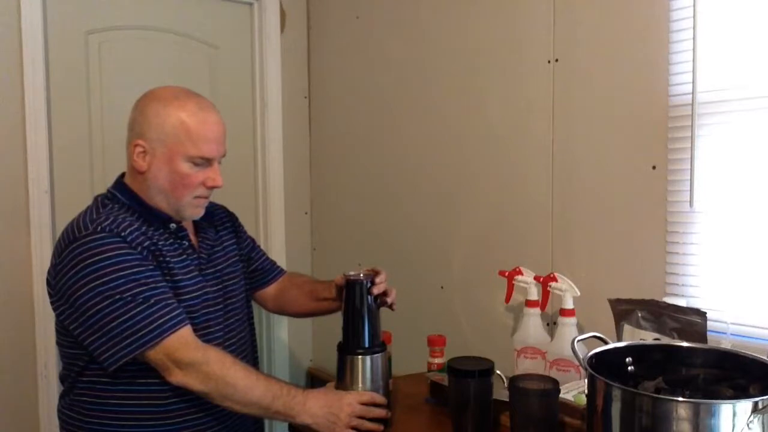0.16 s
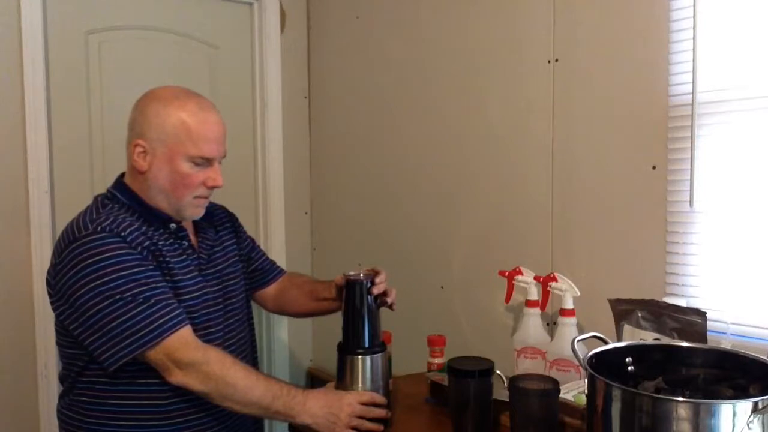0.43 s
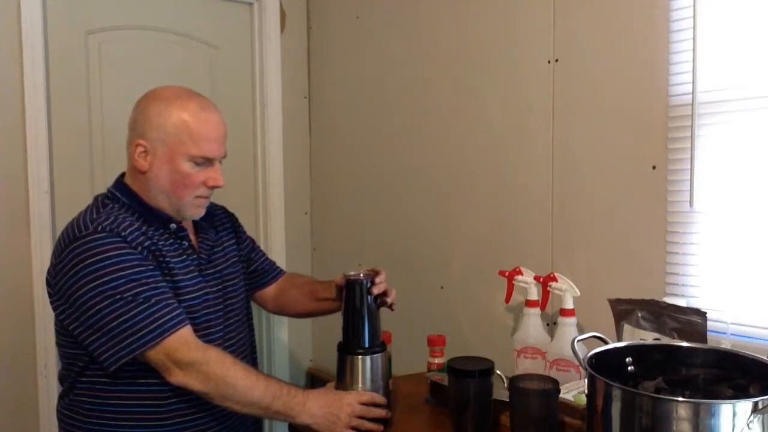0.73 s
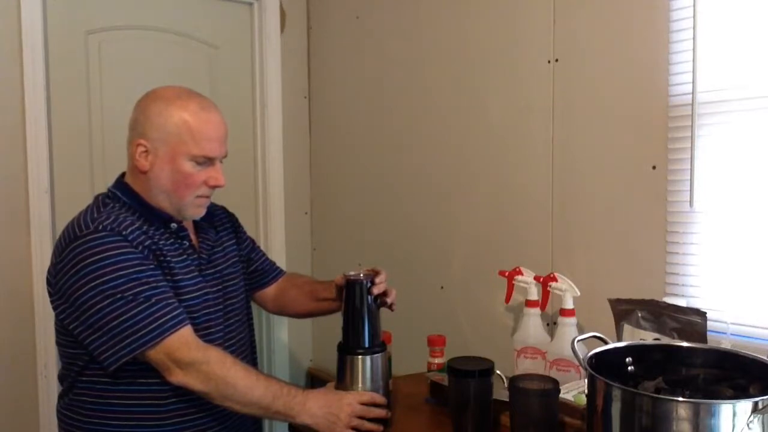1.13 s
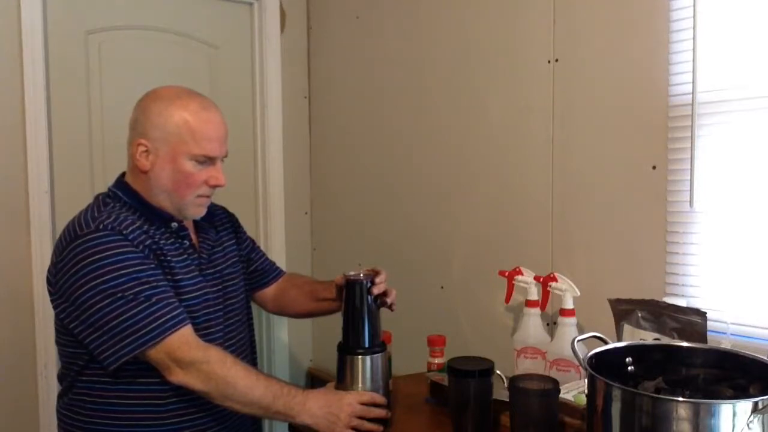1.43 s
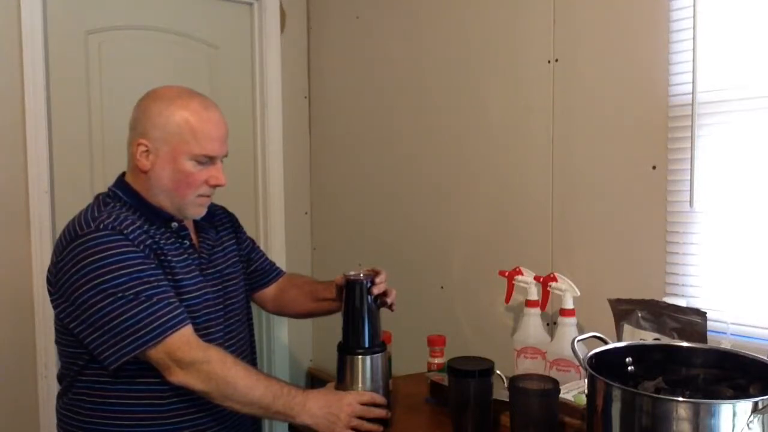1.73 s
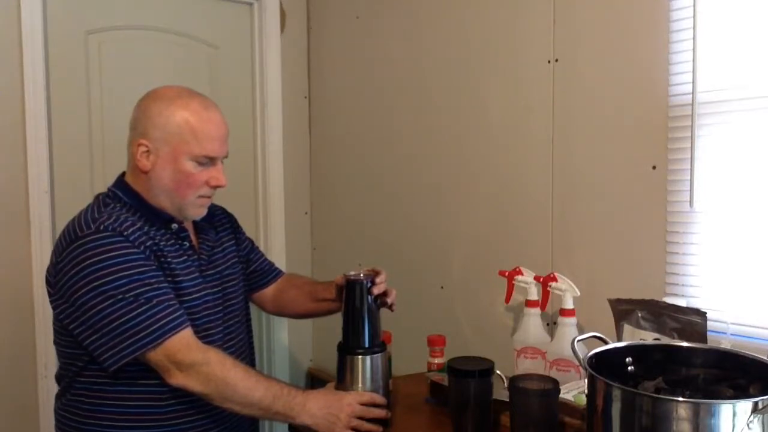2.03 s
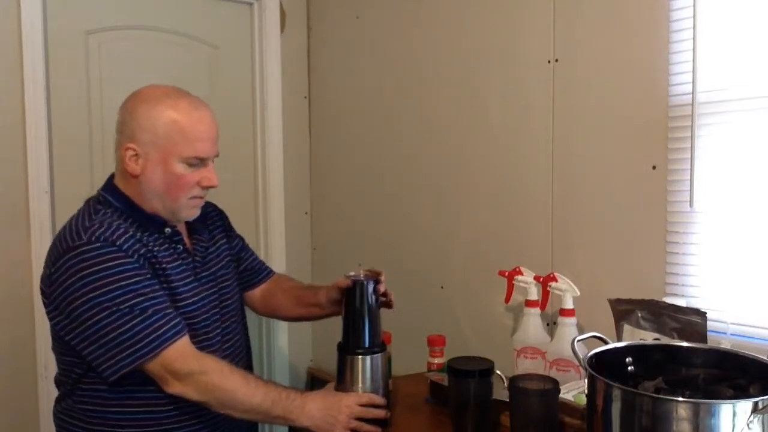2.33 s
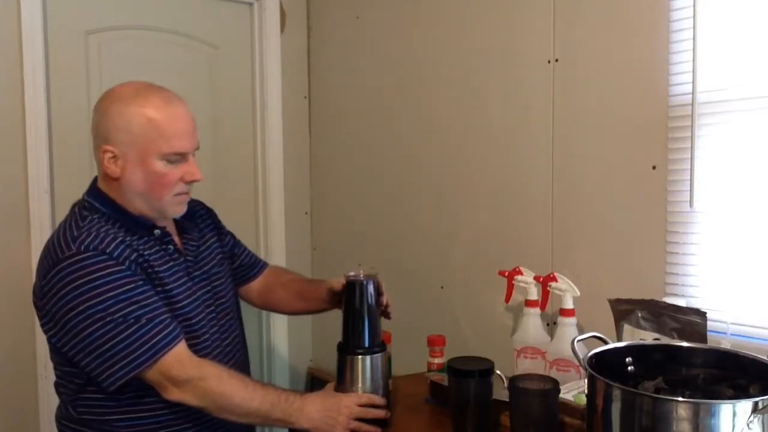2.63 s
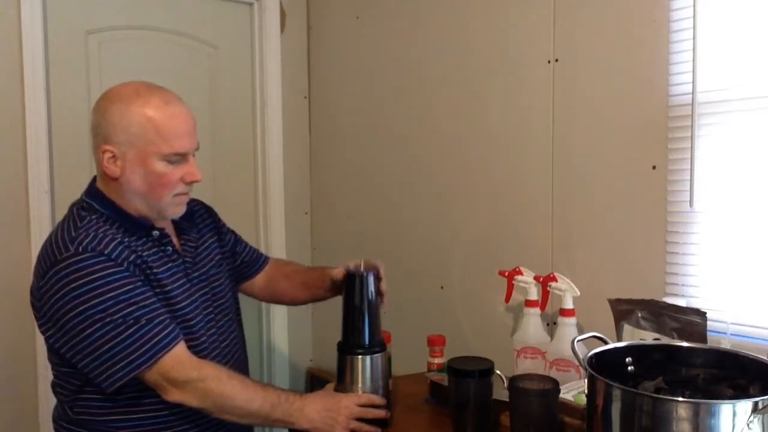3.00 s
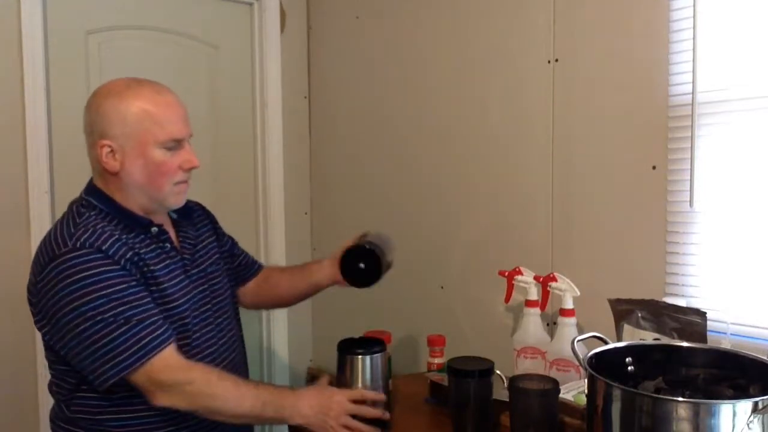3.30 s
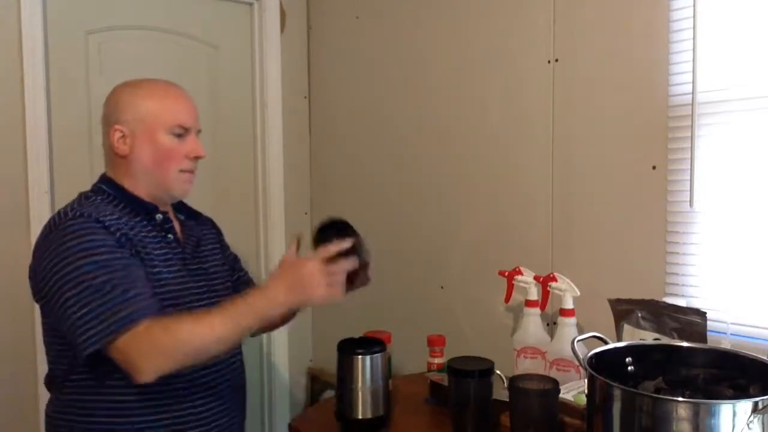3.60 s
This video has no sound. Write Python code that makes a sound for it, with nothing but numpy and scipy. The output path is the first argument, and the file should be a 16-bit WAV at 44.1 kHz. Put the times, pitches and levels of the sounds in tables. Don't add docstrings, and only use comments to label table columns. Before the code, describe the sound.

A small blender grinds hard charcoal with a deafening, rattling roar and bright cracks, then stops with a short squeaky snap; faint scrapes and sliding powder follow in a small bare room, microphone a couple of metres away.

```python
import sys
import numpy as np
from scipy import signal
from scipy.fft import rfft, irfft
from scipy.io import wavfile
from scipy.ndimage import uniform_filter1d, minimum_filter1d

SR = 44100
rng = np.random.default_rng(int(sys.argv[2]) if len(sys.argv) > 2 else 0)


def output_pcm(signal):
    pcm = np.clip(np.atleast_2d(signal).T, -1, 1) * 32767
    wavfile.write(sys.argv[1], SR, np.round(pcm).astype(np.int16))


def invert_db(x):
    u = np.asarray(x, float) / 20
    return 10 ** u


N = 165375
T = np.arange(N) / SR
STOP_S = 2.765

# time_s, level_db
LOAD = [(0, -11.5), (.33, -9.5), (.38, -12.5), (.68, -9), (.79, -13.5), (.86, -9), (.96, -13.5), (1.16, -9),
        (1.22, -14), (1.3, -10), (1.52, -12.5), (1.68, -10.5), (1.88, -14), (2.24, -11.5), (2.5, -16),
        (2.595, -12.5), (2.655, -12), (2.7, -21.5)]
# pitch_hz, level_db
KNOCK = [(100, -69.5), (230, -24.5), (450, -7.5), (826, -9.5), (2060, -4), (2800, -3), (5200, 1),
         (15400, -14.5)]


def level(x, db):
    return x * invert_db(db) / np.sqrt(np.mean(x ** 2))


def colour(x, points):
    hz, db = np.array(points, float).T
    f = np.maximum(np.arange(len(x) // 2 + 1) * SR / len(x), 1)
    gain = invert_db(np.interp(np.log(f), np.log(hz), db))
    return irfft(rfft(x) * gain, len(x))


def band(x, hz, width_hz, times=1):
    b, a = signal.iirpeak(hz, hz / max(width_hz, 2), fs=SR)
    for _ in range(times):
        x = signal.lfilter(b, a, x)
    return x


def walk(rate):
    k = int(SR / rate)
    smooth = uniform_filter1d(rng.standard_normal(N), k)
    return level(uniform_filter1d(smooth, k), 0)


def swell(s, rise, fall):
    rising = np.exp(-((T - s) / rise) ** 2)
    falling = np.exp(-np.maximum(T - s, 0) / fall)
    return np.where(T < s, rising, falling)


def swells(rows):
    return sum(invert_db(db) * swell(s, rise, fall) for s, rise, fall, db in rows)


def clicks(per_s, spread_db):
    hit = rng.random(N) < per_s / SR
    sign = np.sign(rng.standard_normal(N))
    strength = invert_db(spread_db * rng.exponential(size=N))
    return level(hit * sign * strength, 0)


def load_db():
    return np.interp(T, *np.array(LOAD, float).T)


def cup_knocks():
    # pitch_hz, width_hz, level_db
    cup = [(977, 54, -3.5), (1480, 7.7, -11.5), (2077, 25, -4), (2410, 17, 1.5), (3048, 90, 0),
           (3550, 57, 3.5), (4330, 30, 5.5), (4587, 19, 5), (5910, 66, 0.5), (6446, 33, 2.5),
           (6500, 47, -34)]
    churn_per_s = 87
    churn = walk(churn_per_s) - .6 * walk(churn_per_s / 3)
    raw = clicks(9000, 2) * invert_db(1 * churn)
    knocks = level(colour(raw, KNOCK), 0)
    ring = 0
    for hz, width, db in cup:
        ring = ring + invert_db(db + 2.0 * walk(24)) * band(raw, hz, width) / np.sqrt(width)
    rattle_growth_db_s = 4
    rattle = level(band(raw, 2130, 450), -9) * invert_db(rattle_growth_db_s * (T - STOP_S))
    return (knocks + rattle + level(ring, -14.5)) * invert_db(load_db())


def shatter():
    # start_s, level_db
    lumps = [(0.005, -15.5), (0.129, -16), (.23, -19), (0.319, -17), (.45, -23), (.68, -21), (0.794, -8),
             (.87, -16), (1.06, -19.5), (1.14, -15), (1.341, -26), (1.48, -16.5), (1.64, -24.5),
             (1.93, -19.5), (2.06, -14), (2.2, -21.5), (2.3, -18.5), (2.409, -25.5), (2.595, -24.5)]
    rise_s, fall_s = .005, 0.018
    bursts = sum(invert_db(db) * swell(s, rise_s, fall_s) for s, db in lumps)
    centre_hz, width_hz = 10680, 7700
    chips = level(band(clicks(7000, 1.7), centre_hz, width_hz, times=2), 1.6)
    return bursts, chips * bursts


def grinding():
    stop_fade_s, duck = 0.029, 0.97
    running = 1 / (1 + np.exp(np.clip((T - STOP_S) / stop_fade_s, -50, 50)))
    bursts, chips = shatter()
    return running * (cup_knocks() / (1 + duck * bursts) + chips)


def drone():
    # pitch_hz, width_hz, level_db
    table_top = [(174.6, 7.1, -22), (243, 8.5, -23.5), (306.5, 16, -9), (375.7, 12, -1), (432.5, 19, 1),
                 (498.2, 6.6, -5.5), (608, 46, -1), (667.4, 16, -3.5), (1018, 70, -10), (1513, 6.7, -4)]
    power_off_s, coast_db, tail_t60_s = 2.48, -4, 0.38
    follow = 0.39
    shake = clicks(2500, 2.56)
    hum = 0
    for hz, width, db in table_top:
        ring = band(band(shake, hz, 3 * width), hz, width) / np.sqrt(width)
        hum = hum + invert_db(db + 1.4 * walk(18)) * ring
    coast = coast_db * np.clip((T - power_off_s) / .08, 0, 1)
    dying = -60 * np.maximum(T - STOP_S, 0) / tail_t60_s
    return level(hum, -18) * invert_db(follow * load_db() + coast + dying)


def room_tone():
    # pitch_hz, level_db
    air_points = [(35, -36.5), (60, -15), (231, -2), (375, -4.5), (827, -15), (1020, -16.5), (1380, -12),
                  (1580, -16), (15400, -18.5)]
    # pitch_hz, level_db
    hum = [(87, -77.5), (131, -80.5), (173, -76.5)]
    air = level(colour(rng.standard_normal(N), air_points), -59.5) * invert_db(.8 * walk(5))
    for hz, db in hum:
        air = air + invert_db(db + 4.0 + 1.5 * walk(10)) * np.sin(2 * np.pi * hz * T)
    return air


def jolts():
    # start_s, level_db
    bumps = [
        (2.25, -20),
        (2.42, -27.5),
        (2.62, -30),
        (3.05, -47),
    ]
    rise_s, fall_s = 0.0099, .025
    thud = level(band(clicks(1500, 2.0), 400, 600, times=3), 0)
    return thud * sum(invert_db(db) * swell(s, rise_s, fall_s) for s, db in bumps)


def squeak():
    # pitch_hz, width_hz, level_db
    plastic = [(2050, 700, -17), (3120, 300, -7), (3320, 300, -5), (4500, 800, -17), (5850, 300, -5),
               (6060, 280, 0), (9000, 1100, -8), (12000, 1000, -14), (14500, 900, -14)]
    start_s, fall_s = 2.767, .010
    rub = clicks(9000, 1.5)
    tone = sum(invert_db(db) * level(band(rub, hz, width, times=2), 0) for hz, width, db in plastic)
    snap = level(colour(rub, KNOCK), -12)
    return invert_db(-13) * (tone + snap) * swell(start_s + .003, .003, fall_s)


def scrape():
    # start_s, rise_s, fall_s, level_db
    scrapes = [
        (2.98, .05, 0.052, -59.5),
        (3.06, 0.023, 0.044, -54),
        (3.55, 0.054, .04, -65),
        (3.685, .015, 0.043, -62),
    ]
    return level(band(clicks(3000, 2.4), 2100, 1100), 0) * swells(scrapes)


def powder():
    # start_s, rise_s, fall_s, level_db
    slides = [
        (3.015, .03, 0.028, -53.5),
        (3.065, .015, .025, -50.5),
        (3.105, .015, .015, -57.5),
        (3.235, .012, 0.06, -63),
        (3.31, .03, .03, -66.5),
        (3.46, .03, .04, -53),
        (3.56, .05, .025, -57),
        (3.67, .008, .04, -59.5),
    ]
    # pitch_hz, level_db
    grain = [(470, -47), (800, -6), (1770, -13), (2790, -20), (3760, -7.5), (8090, -4), (15400, -8)]
    return level(colour(clicks(14000, 1.2), grain), 0) * swells(slides)


def tail():
    # pitch_hz, decay_s
    decay = [(200, .38), (1500, .37), (6000, .34), (9000, .28), (14000, .21)]
    first_echo_s = .004
    hz, t60 = np.array(decay, float).T
    edges = np.geomspace(60, 18000, 13)
    noise, f, t = rfft(rng.standard_normal(SR)), np.arange(SR // 2 + 1), T[:SR]
    out = 0
    for lo, hi in zip(edges[:-1], edges[1:]):
        fall_s = np.interp(np.log(lo * hi) / 2, np.log(hz), t60)
        out = out + irfft(noise * (f >= lo) * (f < hi), SR) * invert_db(-60 * t / fall_s)
    out = out * (t > first_echo_s)
    return out / np.sqrt(np.sum(out ** 2))


def room(x):
    places, tumble_per_s, echo_db = 4, 110, 1.5
    lead = 12000
    share = np.array([walk(tumble_per_s) for _ in range(places)])
    parts = x * share / np.sqrt(np.sum(share ** 2, axis=0))
    parts = np.pad(parts, ((0, 0), (lead, 0)), mode="reflect")
    wet = sum(signal.fftconvolve(part, tail())[lead:lead + N] for part in parts)
    return (x + invert_db(echo_db) * wet) / np.sqrt(1 + invert_db(2 * echo_db))


def scene():
    in_room = grinding() + jolts() + squeak() + scrape() + powder()
    heard = room(in_room) + drone() + room_tone()
    return np.array([heard, heard])


def roll_off(x):
    return signal.sosfilt(signal.butter(12, 15550, fs=SR, output="sos"), x)


def record(dry):
    low_hz, top_hz, ceiling, limit_samples = 70, 15500, .985, 33
    bass_cut = signal.butter(4, low_hz, "high", fs=SR, output="sos")
    top_cut = signal.ellip(10, .2, 70, top_hz, fs=SR, output="sos")
    cut = signal.sosfilt(top_cut, signal.sosfilt(bass_cut, dry * invert_db(-0.4)))
    room_left = minimum_filter1d(ceiling / np.maximum(np.abs(cut), ceiling), size=limit_samples)
    mix = cut * uniform_filter1d(room_left, size=limit_samples)
    return roll_off(mix)


dry = scene()
out = record(dry)
output_pcm(out)
```